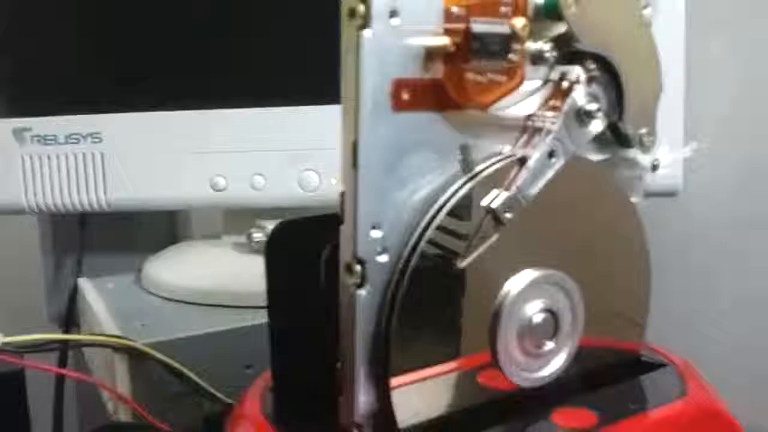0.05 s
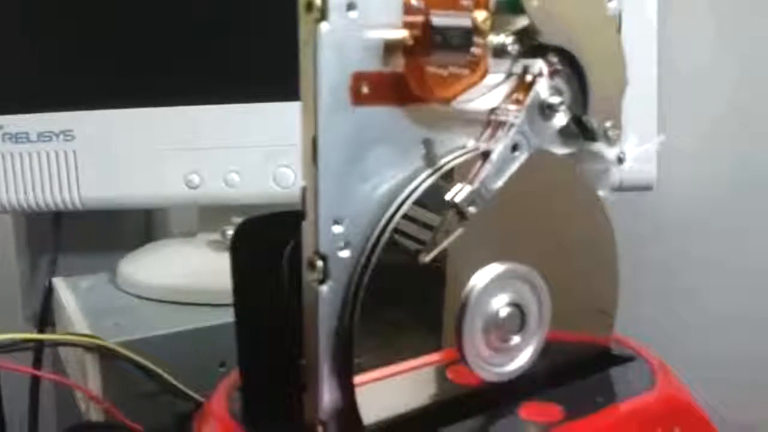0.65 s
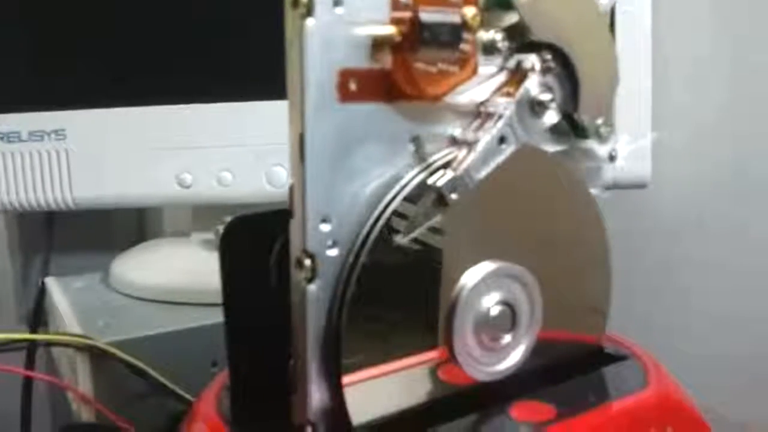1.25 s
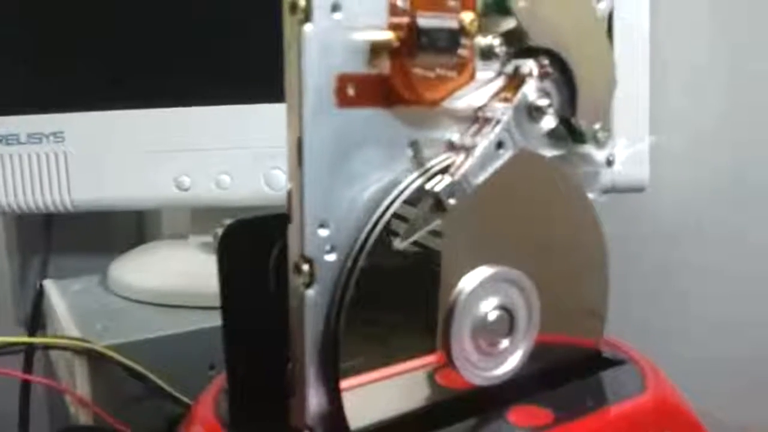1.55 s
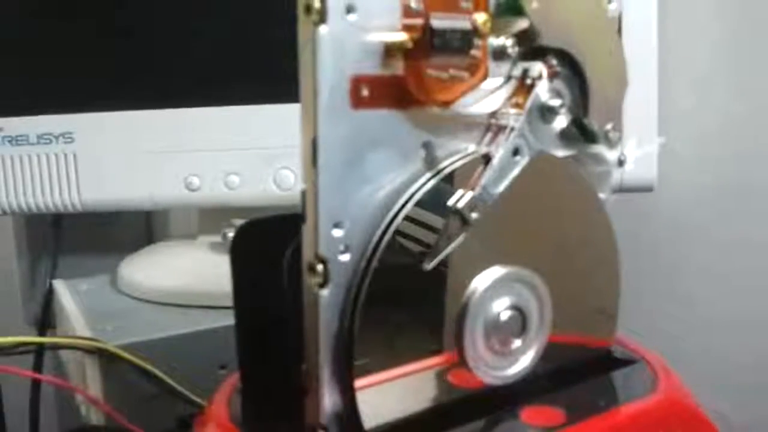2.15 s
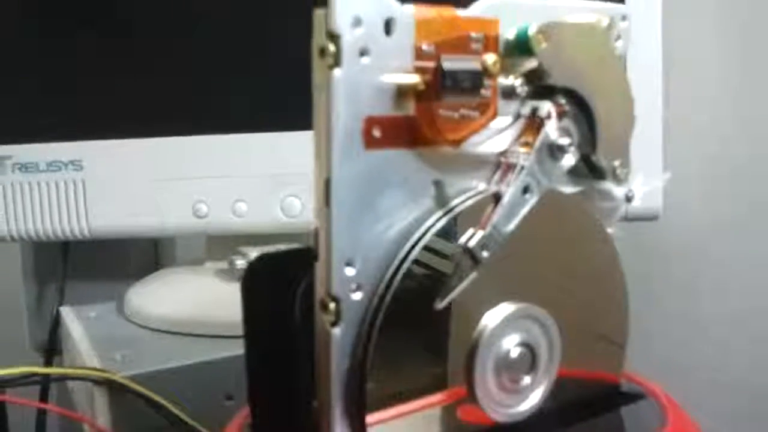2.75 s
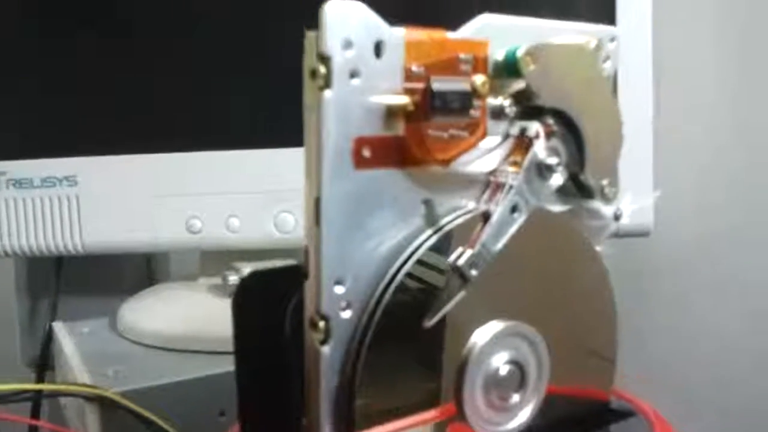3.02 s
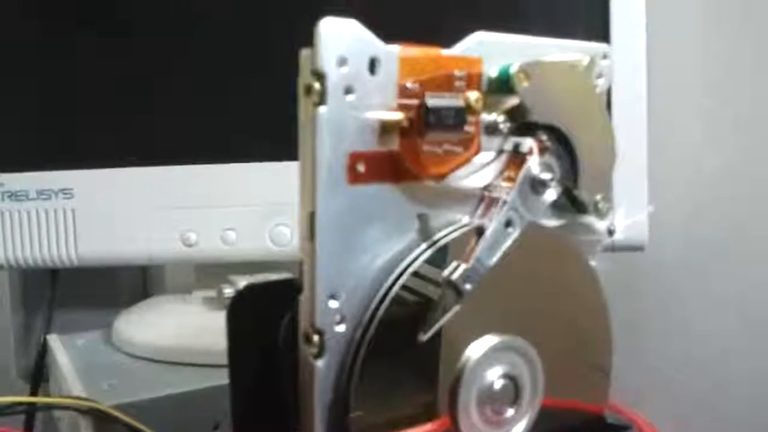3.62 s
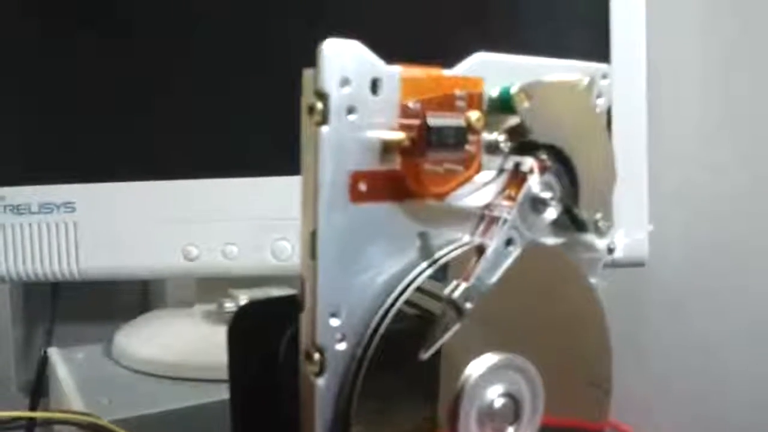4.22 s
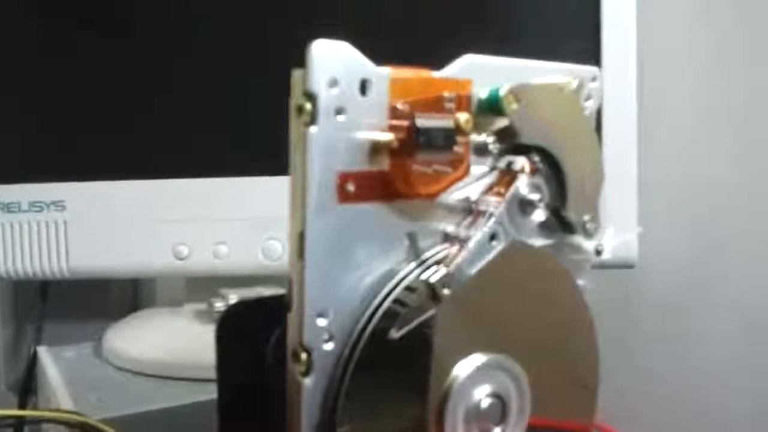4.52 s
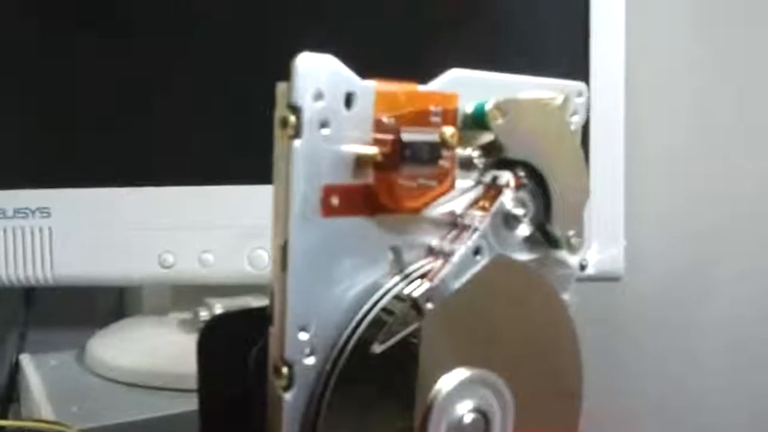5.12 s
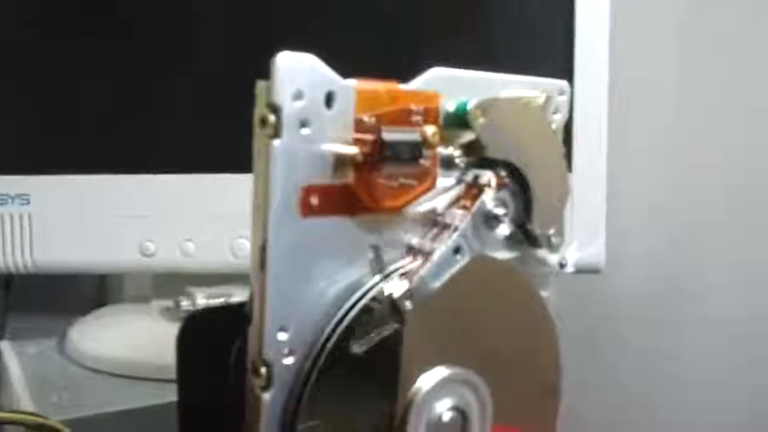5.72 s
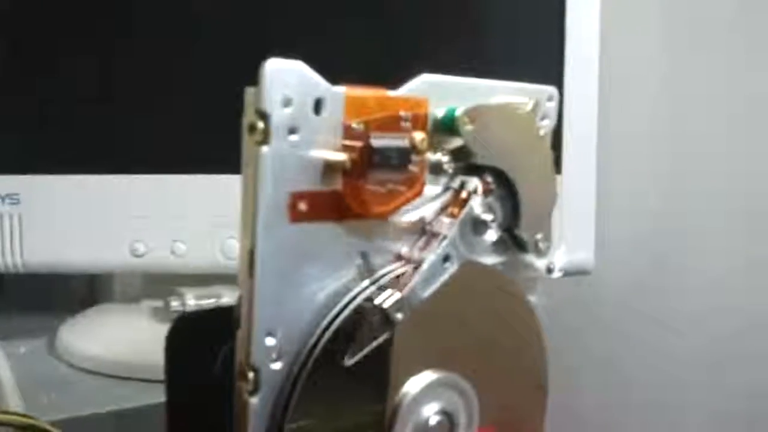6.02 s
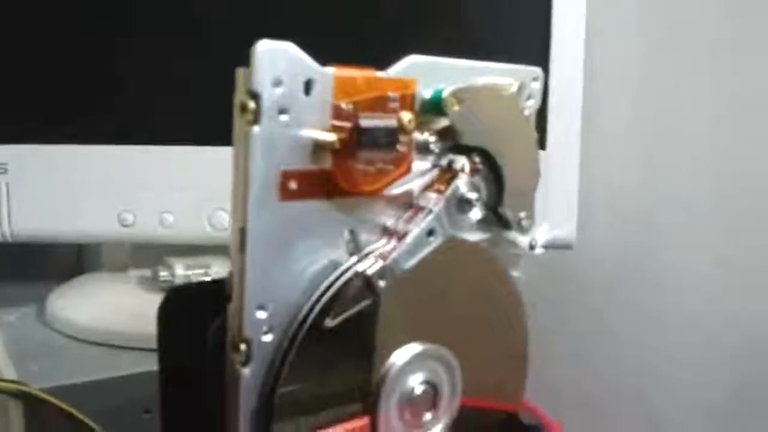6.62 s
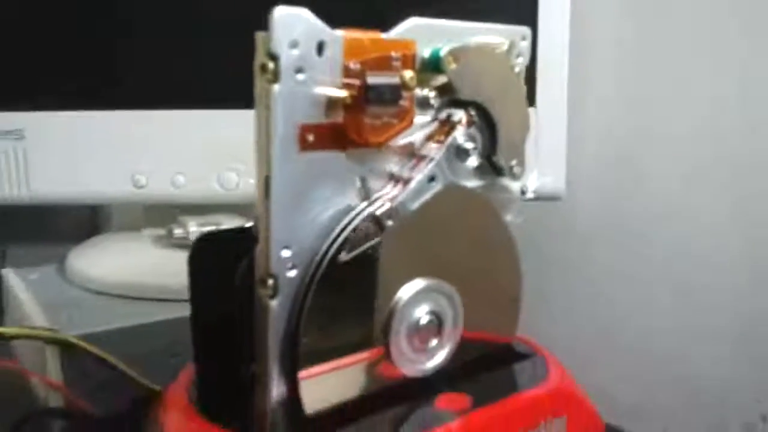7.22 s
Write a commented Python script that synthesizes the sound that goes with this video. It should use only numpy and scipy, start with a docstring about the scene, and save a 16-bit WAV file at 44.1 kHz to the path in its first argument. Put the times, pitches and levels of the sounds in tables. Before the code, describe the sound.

An open hard drive spins with a steady high whine and rush of air, its head arm ticking softly, more often near the end.

```python
"""An opened hard drive spins at about 5400 rpm in a small room. From the start, motor and bearing
tones sound over the rush of air dragged by the platter and a faint hum. From 0.9 s the head arm
seeks with soft ticks, first singly, then from 5.5 s in flurries. Meanwhile a hand-held microphone
rises unevenly along the drive; it draws back at 6.3 s and sinks at 6.9 s. The casing radiates
directionally, so the balance of its tones changes along the way."""
import sys
import numpy as np
from scipy import signal
from scipy.fft import rfft, irfft, next_fast_len
from scipy.io import wavfile
from scipy.ndimage import map_coordinates

SR = 44100
rng = np.random.default_rng(int(sys.argv[2]) if len(sys.argv) > 2 else 0)


def log_audio(samples):
    """Write samples as a 16-bit WAV file to the path given in sys.argv[1]."""
    # one column per channel
    frames = np.atleast_2d(samples).T
    # limit to full scale, then quantise
    limited = np.clip(frames, -1, 1)
    pcm = np.round(limited * 32767).astype(np.int16)
    wavfile.write(sys.argv[1], SR, pcm)


N = 328986
SPIN_HZ = 89.45


def amp(db):
    """Amplitude ratio of a level in decibels."""
    return 10 ** (np.asarray(db) / 20)


def unit(x):
    """Normalisation to rms 1."""
    return x / np.sqrt(np.mean(x ** 2) + 1e-20)


def curve(rows):
    """Linear interpolation of (time, value) rows at every sample."""
    return np.interp(np.arange(N) / SR, *np.transpose(rows))


def wobble(rate):
    """Slow random modulation: a spline through `rate` Gaussian knots a second."""
    coarse = np.arange(0, N + 128, 128)
    knots = rng.standard_normal(int(N * rate / SR) + 4)
    spline = map_coordinates(knots, [coarse * rate / SR], mode="nearest")
    return np.interp(np.arange(N), coarse, spline)


def filtered(x, response):
    """Zero-phase filtering: the spectrum of x times a frequency response."""
    size = next_fast_len(len(x) + 8192)
    return irfft(rfft(x, size) * response(np.fft.rfftfreq(size, 1 / SR)), size)[:len(x)]


def noise(response, n=N):
    """White noise coloured by a frequency response, at rms 1."""
    return unit(filtered(rng.standard_normal(n), response))


def tone(hz, clock):
    """Simple harmonic motion of rms 1 and random phase, timed by the given clock."""
    cycles = (hz * clock + rng.random()) % 1
    return np.sqrt(2) * np.sin(2 * np.pi * cycles)


def directivity(height, back, low, high, far):
    """Directional radiation: the level in dB, interpolated between three listening places."""
    return (1 - back) * (low + (high - low) * height) + back * far


# Microphone path: t/s, height (0 level with the hub, 1 above the arm)
MIC_HEIGHT = [(0, 0.0076), (0.4, 0.077), (1.2, 0.34), (3.05, 0.1), (3.3, 0.42), (4.2, 0.61), (4.9, 0.83),
              (6.9, 0.99), (7.4, 0.21)]

def microphone_path(retreat_s=6.3, retreat_lasts_s=0.95):
    """A moving receiver samples the sound field: its height and its retreat, each from 0 to 1."""
    back = np.clip((np.arange(N) / SR - retreat_s) / retreat_lasts_s, 0, 1)
    return curve(MIC_HEIGHT), back


# Motor harmonics: multiple of the spin, level/dB from low, level/dB from high
MOTOR_HARMONICS = [(12, -77, -66), (32, -57, -64.5), (38, -68.5, -70), (42, -53, -60), (46, -60.5, -68),
                   (48, -55.8, -46.5), (50, -67, -65), (52, -63, -59), (58, -66, -52), (60, -56, -45),
                   (62, -63.5, -64.5), (64, -55, -58), (70, -66.5, -63.5), (72, -61.5, -67),
                   (74, -60.5, -68), (76, -71.5, -70), (78, -69, -66), (80, -77, -66), (82, -71, -77)]
# Sharply beamed motor tones: f/Hz, level/dB from low, from high, from further back
MOTOR_BEAMS = [(3220.4, -52, -47.3, -54.5), (3578.2, -46.5, -56.5, -48.5), (3935.8, -48.3, -54.5, -65)]

def motor_whine(height, back, clock, waver_db=0.98):
    """Periodic forcing: the motor sounds even harmonics of the spin, each with its own directivity."""
    out = np.zeros(N)
    for order, low, high in MOTOR_HARMONICS:
        out += amp(low + (high - low) * height + waver_db * wobble(6)) * tone(order * SPIN_HZ, clock)
    for hz, *levels in MOTOR_BEAMS:
        out += amp(directivity(height, back, *levels) + waver_db * wobble(12)) * tone(hz, clock)
    return out


# Envelopes of two whines: t/s, level/dB
LOWER_SWELL = [(0, -63.5), (3.1, -63.5), (4.95, -49), (5.65, -51), (6.07, -58), (6.4, -49.5), (6.8, -42.5),
               (7.45, -44.5)]
UPPER_SWELL = [(0, -48), (1.8, -47.5), (2.55, -61), (3.6, -45.5), (4.55, -53.5), (5.2, -50.5), (5.9, -56.5),
               (6.7, -67.5), (7.3, -52.5)]

def swelling_whines(clock, lower_hz=3465, upper_hz=3807.7, waver_db=0.98):
    """Amplitude modulation: two whines locked to the spindle swell and fade independently."""
    return sum(amp(curve(swell) + waver_db * wobble(12)) * tone(hz, clock)
               for hz, swell in [(lower_hz, LOWER_SWELL), (upper_hz, UPPER_SWELL)])


# Bearing partials: f/Hz, level/dB from low, level/dB from high
BEARING_PARTIALS = [(696.5, -69, -67), (1199.1, -65.9, -64.9), (1499.2, -66.2, -65.7), (2052.4, -71, -61.5),
                    (2389.5, -64.9, -64.6), (2889.5, -62.6, -66.4), (2901.6, -60.7, -64.3),
                    (3123.7, -63.0, -62.2), (3653.2, -62.8, -71.4), (3701.7, -63.1, -62.2),
                    (3718.5, -55.4, -61.3), (3792.5, -61.5, -61.6), (3822.8, -62.1, -63.4),
                    (3868.6, -61.6, -66.6), (3890.8, -66.7, -58.9), (3980.3, -61.1, -64.4),
                    (4060.4, -59.3, -64.0), (4306.0, -66.9, -59.9), (5087.2, -60.5, -61.1),
                    (5123.6, -66.5, -60.2), (5189.0, -69, -52.5), (5217.8, -54.9, -55.9),
                    (5244.0, -59.7, -59.4), (5272.9, -65.1, -59.2), (5322.7, -81.4, -54.4),
                    (5338.2, -68.9, -56.7), (5442.5, -75.6, -63.3), (5461.4, -70.7, -62.5),
                    (5473.5, -76.3, -61.5), (5518.6, -58, -62.5)]
# Thin upper whistles of the bearing: f/Hz, relative level/dB
BEARING_WHISTLES = [(4745, -67), (4790, -67), (5768, -67), (6203, -67), (6545, -64), (6693, -67),
                    (6755, -68), (6844, -64), (6890, -65), (6935, -66), (7106, -69), (7290, -72)]

def bearing_tones(height, clock, waver_db=3.0, whistle_db=-2, whistle_waver_db=3.5):
    """Rolling contact: inharmonic partials follow the spindle's speed and waver in level."""
    out = np.zeros(N)
    for hz, low, high in BEARING_PARTIALS:
        out += amp(low + (high - low) * height + waver_db * wobble(5)) * tone(hz, clock)
    for hz, db in BEARING_WHISTLES:
        out += amp(whistle_db + db + whistle_waver_db * wobble(3.3)) * tone(hz, clock)
    return out


def ball_sizzle(clock, level_db=-54.5, scatter_db=0.5):
    """Periodicity gives a line spectrum: the balls' pattern recurs every four turns, a treble comb."""
    spacing_hz, size = SPIN_HZ / 4, 8192
    lines_hz = np.arange(size // 2 + 1) * spacing_hz
    lines_db = np.interp(lines_hz, [2030, 2860, 3350, 3900, 4380, 4740, 5300, 5950, 6740, 7400],
                         [-33, -3.5, -2.5, -1, 11.5, -4, 1.5, -1.5, -3.5, -11], left=-120, right=-120)
    lines_db -= scatter_db * rng.standard_normal(len(lines_hz))
    phases = np.exp(2j * np.pi * rng.random(len(lines_hz)))
    cycle = irfft(amp(lines_db) * phases)
    position = clock * spacing_hz % 1 * size
    return amp(level_db) * unit(np.interp(position, np.arange(size), cycle))


# Spectrum of the rushing air: f/Hz, relative spectral level/dB
AIR_SPECTRUM = [(25, -42.5), (50, -29.5), (100, -14.5), (200, -0.5), (450, 0.5), (700, 2), (900, -0.5),
                (1400, 0), (1800, -5.5), (2700, -3.5), (4500, -2), (6000, -3), (7000, -3), (7500, -24)]

def platter_air(level_db=-48.5):
    """Turbulence: air torn off the platter radiates broadband noise."""
    knots_hz, db = np.transpose(AIR_SPECTRUM)
    return amp(level_db) * noise(lambda hz: amp(np.interp(np.log(hz + 1), np.log(knots_hz), db)))


# Casing resonances: f/Hz, width/Hz, level/dB from low, level/dB from high
CASING_MODES = [(644, 63, -62, -64), (1250, 190, -60.5, -61.5), (1653, 100, -63, -61),
                (2037, 270, -58, -61.5), (2387, 110, -65, -57), (2955, 210, -53.5, -62),
                (3270, 130, -70.5, -54), (3780, 420, -55, -55), (5250, 240, -61.5, -51)]

def casing_ring(height, clock, flutter=0.25):
    """Resonance: the air drives the casing's modes at random, a little harder twice a turn."""
    ring = np.zeros(N)
    for centre, width, low, high in CASING_MODES:
        band = noise(lambda hz: 1 / (1 + ((hz - centre) / (0.58 * width)) ** 2))
        ring += amp(low + (high - low) * height + 0.56 * wobble(4.7)) * band
    return ring * (1 + flutter * tone(2 * SPIN_HZ, clock))


# Resonances beamed past the arm: f/Hz, width/Hz, level/dB from low, from high, from further back
BEAMED_MODES = [(1746, 120, -74, -69.5, -57.5), (2125, 190, -71.5, -60, -70),
                (3506, 65, -68.5, -66.5, -48.5), (5177, 88, -58, -62.5, -53), (5407, 130, -70.5, -52, -56),
                (7030, 58, -76.5, -75, -65.5)]

def casing_beams(height, back):
    """Directivity: narrow casing resonances swell as the microphone enters their beams."""
    out = np.zeros(N)
    for centre, width, *levels in BEAMED_MODES:
        band = noise(lambda hz: 1 / (1 + ((hz - centre) / (0.31 * width)) ** 4))
        out += amp(directivity(height, back, *levels)) * band
    return out


# Mains and fan tones: f/Hz, level/dB
HUM_TONES = [(119.8, -76.5), (199.9, -80.5), (222.1, -63), (232.2, -74), (348.6, -69.5), (402.4, -70.5)]

def room_hum(waver_db=0.5, jitter_s=0.00027):
    """Forced vibration: mains and fans in the room hum, slightly unsteady in level and phase."""
    t = np.arange(N) / SR
    return sum(amp(db - waver_db * wobble(7)) * tone(hz, t + jitter_s * wobble(4))
               for hz, db in HUM_TONES)


# Modes rung by a seek: f/Hz, relative level/dB, T60/s
IMPACT_MODES = [(702, -11, 0.11), (800, -11.5, 0.17), (963, -7, 0.2), (1089, 0, 0.16), (1182, -4.5, 0.09),
                (1331, -5.5, 0.12), (1628, 1, 0.069), (3067, -12, 0.12), (3420, -7, 0.056),
                (4040, -8, 0.11), (4620, -12.5, 0.09), (5090, -6.5, 0.058)]

def seek_tick(t, knock_db, ring_db, rise_s=0.0012):
    """Impulse response: damped modes of frame and arm ring out over a short scuff and crack."""
    snap_db = 20 * np.log10(amp(knock_db) + amp(ring_db)) - 2.5  # grows with both knock and ring
    modes = np.zeros(len(t))
    for hz, db, t60 in IMPACT_MODES:
        # The frame knocks in the low modes; the arm rings in the middle and snaps at the top.
        drive_db = knock_db if hz < 1400 else ring_db if hz < 2500 else snap_db
        drive_db += rng.normal(0, 1)
        struck_hz = hz * (1 + rng.normal(0, 0.007))
        modes += amp(drive_db + db - 60 * t / t60) * tone(struck_hz, t)
    scuff = noise(lambda hz: (hz > 600) & (hz < 2100), len(t))
    scuff *= amp(knock_db - 4 - 60 * t / 0.08)
    crack = noise(lambda hz: (hz > 2700) / (1 + (hz / 4900) ** 8), len(t))
    crack *= amp(snap_db + 4 - 60 * t / 0.05)
    return (modes + scuff + crack) * (1 - np.exp(-t / rise_s))


# Head seeks: t/s, relative level/dB of the frame's knock, relative level/dB of the arm's ring
SEEK_EVENTS = [(0.906, -41, -41.5), (1.814, -39.5, -41), (4.556, -42, -39.5), (4.936, -42, -58),
               (5.155, -44, -49), (5.563, -38, -50), (5.607, -37, -44.5), (5.635, -41, -39),
               (5.857, -37, -39), (5.891, -32.5, -54), (5.94, -35, -44.5), (6.013, -35, -40.5),
               (6.054, -37, -50), (6.174, -41, -46.5), (6.357, -34.5, -43), (6.392, -36, -42),
               (6.421, -36.5, -41), (6.446, -35.5, -52), (6.58, -32.5, -45.5), (6.64, -36, -45),
               (6.803, -32.5, -51), (6.863, -41, -55.5), (7.23, -35.5, -45), (7.383, -35, -41.5),
               (7.415, -40.5, -39)]

def head_seeks(level_db=2, frame_db=-8.5, room_db=-8, room_t60=0.2, thud_db=-36, thud_hz=55):
    """Action and reaction: the voice coil flings and brakes the arm, for a reverberant tick and a thud."""
    t = np.arange(SR // 3) / SR
    out = np.zeros(N + len(t))
    for start_s, knock_db, ring_db in SEEK_EVENTS:
        knock_db += frame_db
        tick = seek_tick(t, knock_db, ring_db)
        room = rng.standard_normal(len(t)) * amp(-60 * t / room_t60) * (t > 0.008)
        reverb = amp(room_db) * signal.fftconvolve(tick, room / np.linalg.norm(room))[:len(t)]
        thud = amp(knock_db + thud_db - 60 * t / 0.1) * np.sin(2 * np.pi * thud_hz * t)
        out[round(start_s * SR):][:len(t)] += amp(level_db) * (tick + reverb + thud)
    return out[:N]


def scene():
    """Superposition: all sources add at one moving microphone."""
    height, back = microphone_path()
    clock = np.arange(N) / SR + 8e-6 * wobble(4)  # the spindle's speed hunts very slightly
    motor = motor_whine(height, back, clock) + swelling_whines(clock)
    bearing = bearing_tones(height, clock) + ball_sizzle(clock)
    air = platter_air() + casing_ring(height, clock) + casing_beams(height, back)
    return (motor + bearing + air + room_hum() + head_seeks())[None]


def record(dry):
    """Band limiting: a steep low-pass removes the top of the treble."""
    cutoff_hz = 7500
    return np.array([filtered(x, lambda hz: 1 / np.sqrt(1 + (hz / cutoff_hz) ** 160)) for x in dry])


dry = scene()
out = record(dry)
log_audio(out)
```